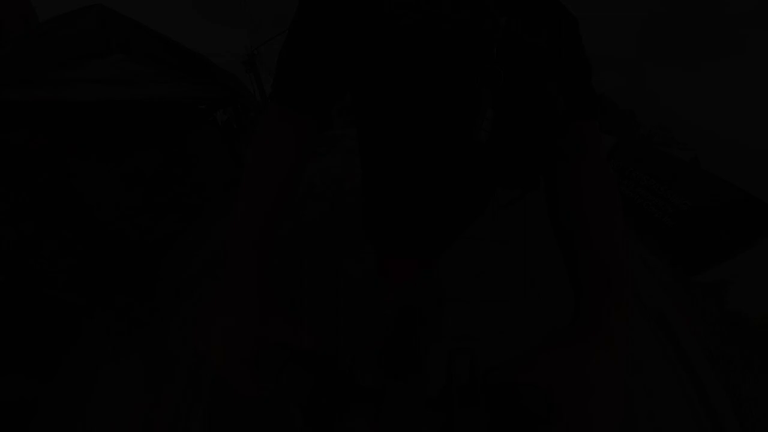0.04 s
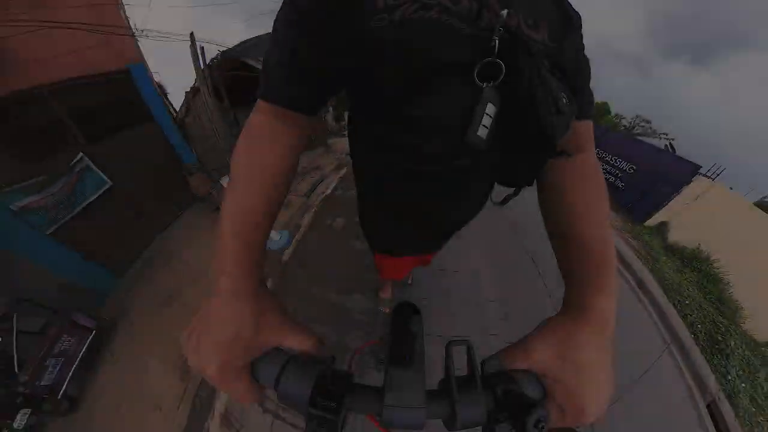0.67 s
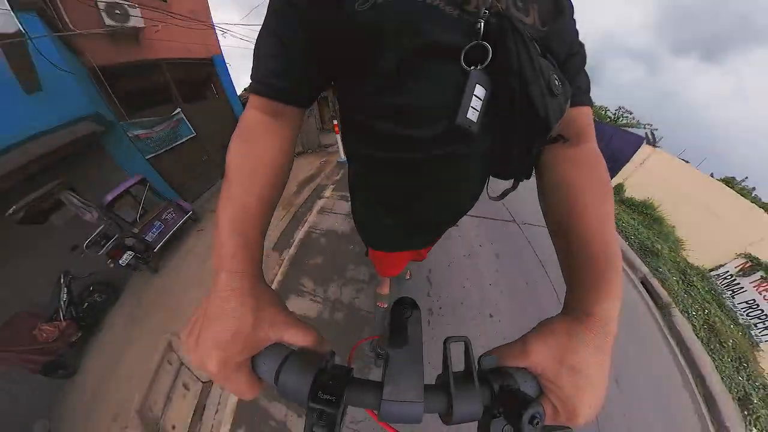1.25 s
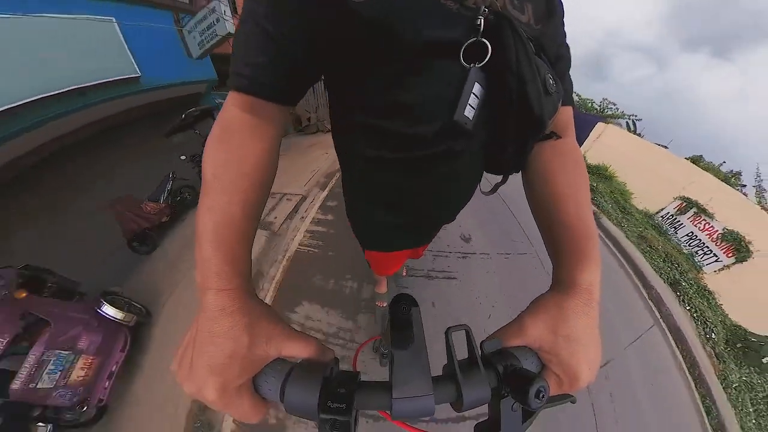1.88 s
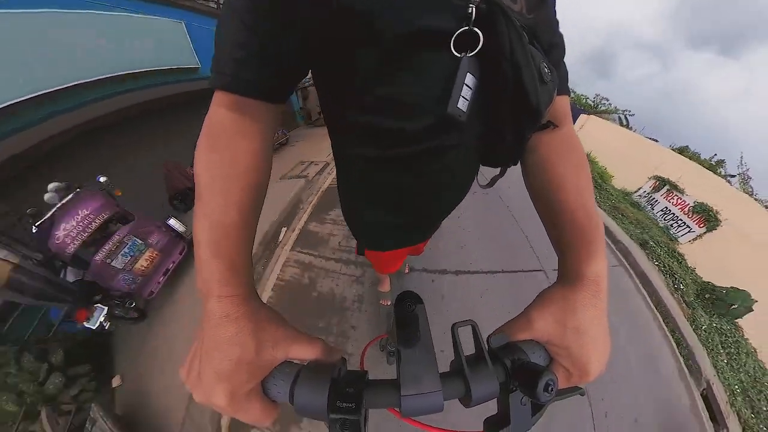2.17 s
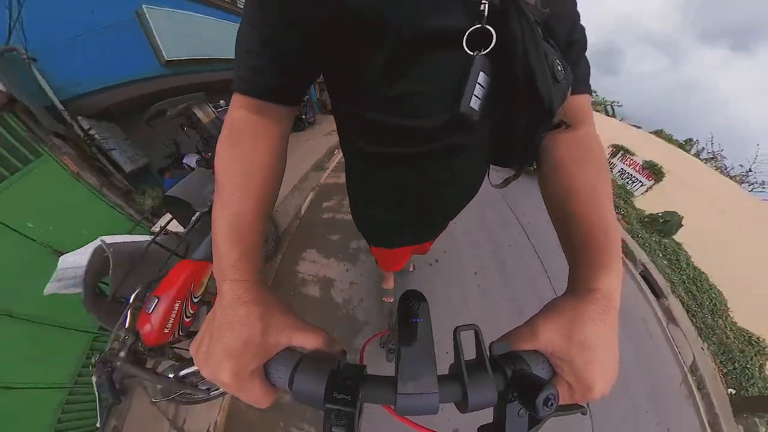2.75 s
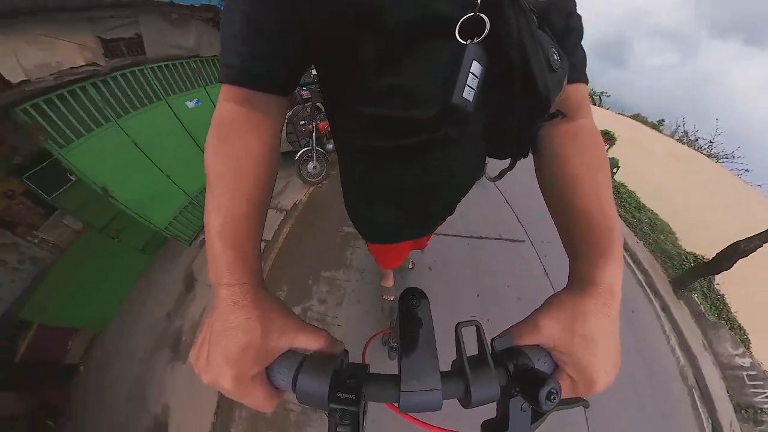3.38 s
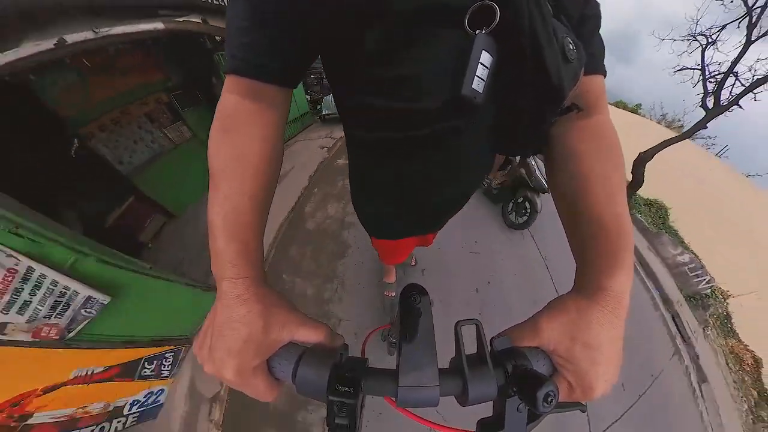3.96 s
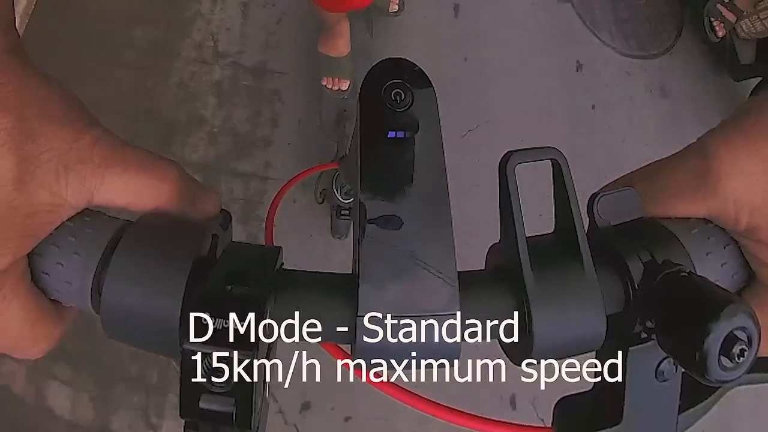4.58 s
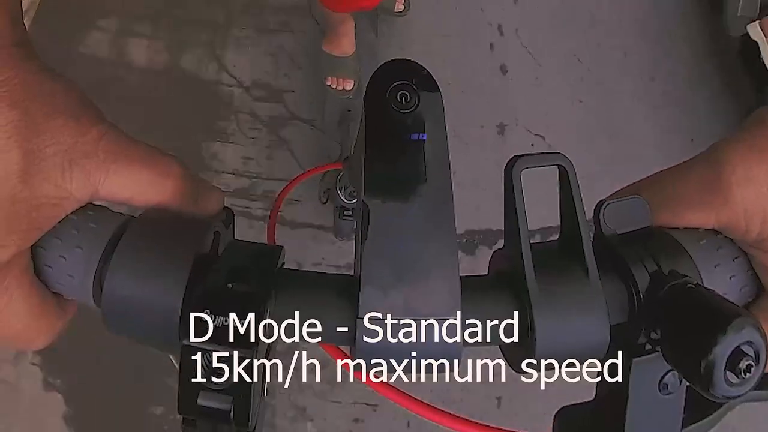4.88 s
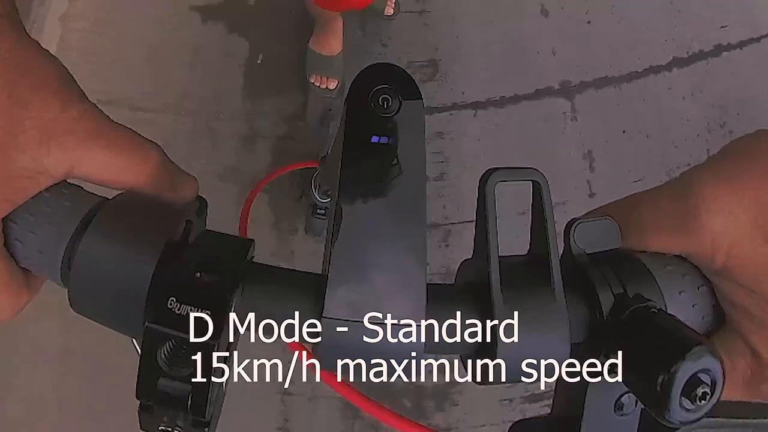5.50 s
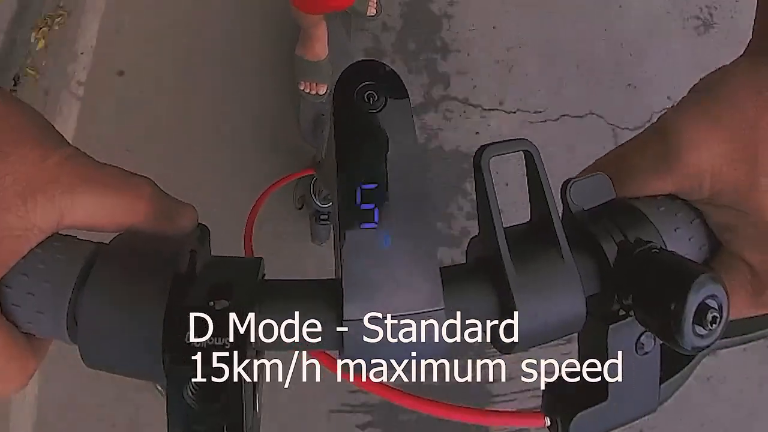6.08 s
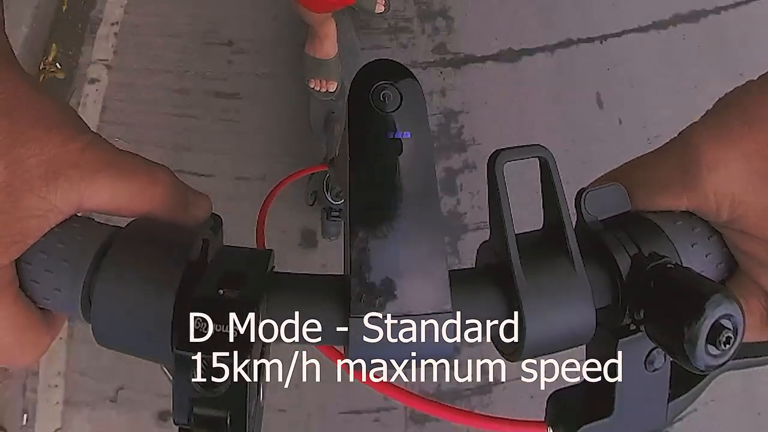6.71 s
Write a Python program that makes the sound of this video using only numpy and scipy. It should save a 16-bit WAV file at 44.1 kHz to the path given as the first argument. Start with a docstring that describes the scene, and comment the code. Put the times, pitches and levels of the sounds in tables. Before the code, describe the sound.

An electric scooter rolls along a concrete street, heard from the handlebar. The sound fades in over the first half second: deep tyre and frame rumble, wind buffeting the microphone, and a soft, steady motor hum with a faint whine. The wheels knock and thud irregularly over joints throughout, most densely from about 0.8 to 1.7 seconds, with hard jolts clacking the stem. From 2 seconds, street noise and a thin hiss swell with a faint hollow ring. A few short, faint squeaks come between 2.5 and 3.1 seconds. The wind gusts harder from about 3.5 seconds, and a cluster of strong jolts lands just after 4. A motorcycle then putters past in the background, strongest around 4.6 and 5.5 seconds. A loose part rattles lightly, mostly from 5.3 to 5.8 seconds. Rumble, gusts and bumps continue until the end, near 6.7 seconds.

```python
"""An electric scooter rolls down a concrete street, heard from its handlebar.
The ride fades in: the road shakes the frame, the hub motor hums, wind buffets the microphone.
From the first second the wheels knock over joints, and hard jolts clack the stem. From 2 s street
noise swells with a hollow ring; near 3 s something squeaks at the roadside. From 4 s a motorcycle
putters past the other way and a loose part rattles."""
import sys
import numpy as np
from scipy.fft import rfft, irfft, next_fast_len
from scipy.io import wavfile
from scipy.ndimage import uniform_filter1d, minimum_filter1d, map_coordinates

SR = 44100
rng = np.random.default_rng(int(sys.argv[2]) if len(sys.argv) > 2 else 0)


def digitize_waveform(pressure):
    """Quantize a signal to 16-bit integers and store it at the path in sys.argv[1].

    Rows of a 2-D input are taken as channels; values are limited to [-1, 1].
    """
    field = np.atleast_2d(pressure).T
    bounded = np.clip(field, -1, 1)
    quanta = np.round(bounded * 32767).astype(np.int16)
    wavfile.write(sys.argv[1], SR, quanta)


N = 297234
TIME_S = np.arange(N) / SR


# frame rumble, road grain: f/Hz, level/dB
FRAME_SPECTRUM = [(40, -39.5), (80, -2.5), (112, 4.5), (150, 0.5), (190, -5.5), (260, -18.5), (600, -56.5),
                  (1500, -100)]
ROAD_SPECTRUM = [(100, -37), (200, -4.5), (260, 1.5), (330, 0.5), (430, -6.5), (520, -8), (620, -17),
                 (850, -21), (1200, -35.5), (2500, -59.5), (4500, -87.5)]
# rougher and smoother concrete: t/s, gain/dB, half width/s
ROAD_PATCHES = [(2.17, 2.5, 0.095), (3.9, -5, 0.11), (4.11, 2, 0.061), (5.85, -2.5, 0.15)]

def rolling():
    """Rough concrete kicks the wheels; the frame rumbles."""
    kicks = unit(impacts(per_s=400, spread_db=3) + 0.5 * noise())
    frame_db = -27 - 0.39 * TIME_S + 0.38 * wobble(14)
    road_db = -34 + 0.73 * TIME_S + 0.85 * wobble(18)
    road_db += sum(db * swell(t, half_s) for t, db, half_s in ROAD_PATCHES)
    return amp(frame_db) * coloured(kicks, FRAME_SPECTRUM) + amp(road_db) * coloured(kicks, ROAD_SPECTRUM)


# wheel knocks, tyre thuds, stem clacks: t/s, level/dB, f/Hz
WHEEL_KNOCKS = [(0.198, -35.5, 480), (0.3427, -21, 436), (0.575, -29.5, 480), (0.8099, -20, 388),
                (0.8365, -14, 400), (0.8493, -19, 410), (0.9215, -22.5, 440), (1.0205, -24, 420),
                (1.0954, -16, 380), (1.1005, -12.5, 430), (1.1989, -18, 310), (1.3244, -16, 350),
                (1.404, -20.5, 320), (1.446, -18, 400), (1.4565, -17, 410), (1.548, -20, 470),
                (1.581, -26, 440), (1.667, -14, 400), (1.675, -20, 380), (1.6941, -21.5, 325),
                (1.952, -22.5, 420), (1.989, -22, 460), (2.1563, -17.5, 330), (2.178, -17, 260),
                (2.631, -16, 400), (2.8051, -21.5, 357), (2.8526, -19, 345), (2.9453, -21, 400),
                (3.3735, -20, 385), (3.724, -23, 520), (3.742, -20, 360), (3.798, -16.5, 335),
                (3.842, -28, 470), (4.0505, -21, 440), (4.106, -13.5, 410), (4.1146, -16.5, 355),
                (4.2402, -21.5, 450), (4.264, -24, 370), (4.419, -31, 490), (4.4571, -19.5, 390),
                (4.547, -21, 490), (5.568, -22, 520), (5.7426, -18, 395), (5.768, -21.5, 470),
                (5.858, -17, 355), (6.191, -23.5, 470), (6.2015, -22, 377), (6.329, -19, 460),
                (6.5921, -17, 430), (6.664, -18.5, 335)]
TYRE_THUDS = [(0.8506, -15.5, 131), (0.952, -12, 116), (1.0998, -17, 129), (1.4372, -13.5, 127),
              (1.551, -15, 130), (1.678, -11.5, 129), (1.9566, -12.5, 148), (2.158, -11.5, 185),
              (2.633, -9.5, 125), (4.1217, -12, 156), (4.153, -11.5, 115), (4.164, -14.5, 125),
              (4.3185, -21, 118), (4.623, -17, 101), (4.6431, -11, 100), (4.7761, -11, 105),
              (5.2114, -14, 126), (5.487, -13, 104), (5.7426, -13.5, 129), (5.922, -16.5, 98),
              (6.663, -12, 135)]
STEM_CLACKS = [(0.3425, -43, 660), (0.348, -32, 670), (0.3539, -32.5, 670), (0.8187, -29, 700),
               (0.8368, -26, 960), (0.8502, -27.5, 720), (1.0943, -26.5, 1100), (1.0963, -34, 1650),
               (1.0995, -25.5, 760), (1.103, -26.5, 726), (1.3245, -29, 736), (1.4455, -28.5, 720),
               (1.457, -30, 660), (1.4624, -27, 690), (1.4675, -29, 720), (1.5485, -32, 700),
               (1.666, -28, 620), (2.63, -32, 780), (3.7405, -29.5, 650), (4.0515, -35.5, 770),
               (4.1069, -29.5, 660), (4.1603, -17.5, 830), (4.7119, -27, 700), (4.853, -28, 800),
               (4.9422, -26, 920), (5.2716, -22.5, 980), (5.3313, -27, 900), (5.4263, -27.5, 820),
               (5.5717, -31, 790), (6.5934, -22.5, 680)]
# stem chatter: f/Hz, level/dB
CHATTER_SPECTRUM = [(150, -29), (300, 0), (550, 6), (850, -10), (1300, -17), (2200, -37), (3500, -66)]

def bumps():
    """Joints knock the wheels; hard jolts shake the stem. Rubber tyres cut the treble."""
    out = np.zeros(N)
    for t, db, hz in WHEEL_KNOCKS:
        add(out, t, amp(db) * (knock(hz, cycles=0.69) + amp(-5) * deck_boom()))
    for t, db, hz in TYRE_THUDS:
        add(out, t, amp(db) * knock(hz, cycles=0.55))
    for t, db, hz in STEM_CLACKS:
        add(out, t, amp(db) * knock(hz, cycles=0.81))
    chatter = amp(-13) * bursts(STEM_CLACKS, t60_s=0.04) * coloured(noise(), CHATTER_SPECTRUM)
    return filtered(out + chatter, lambda hz: 1 / (1 + (hz / 3300) ** 10))


def knock(hz, cycles):
    """Rubber-cushioned swing, gone within a cycle or two."""
    turns = event_time_s() * hz
    return np.exp(-(turns / cycles) ** 2) * np.sin(2 * np.pi * turns)


def deck_boom(attack_s=0.0017, t60_s=0.052):
    """One damped deck mode; pitch varies per knock."""
    age_s = np.maximum(event_time_s(), 0)
    hz = 217 * np.exp(0.055 * rng.standard_normal())
    return np.tanh(age_s / attack_s) * amp(-60 * age_s / t60_s) * np.sin(2 * np.pi * hz * age_s)


# motor hum: t/s, f/Hz, level/dB
MOTOR_HUM = [(0.1, 131, -31.5), (0.5, 131, -28), (0.8, 134, -27), (1.35, 135, -31.5), (1.7, 137, -28.5),
             (2.4, 139.4, -24.5), (3.05, 141.1, -24.5), (3.5, 142, -30), (3.85, 141.5, -30.5),
             (4.2, 140.8, -41), (4.9, 139.1, -30.5), (5.6, 142, -41.5), (6.7, 137.8, -31.5)]

def hub_motor(whine_hz=527.6):
    """Hum and a growing whine, both shaken by the road."""
    hum_hz, hum_db = curves(MOTOR_HUM)
    hum = amp(hum_db + 0.5 * wobble(12)) * tone(hum_hz + 2.4 * wobble(30))
    whine = amp(-45.7 + 0.3 * TIME_S + 3.5 * wobble(24)) * tone(whine_hz + 12 * wobble(60))
    return np.sqrt(2) * (hum + whine)  # levels are rms


# buffeting: f/Hz, level/dB
WIND_SPECTRUM = [(12, -36), (24, -13.5), (38, -3.5), (60, 2), (90, -0.5), (130, -2.5), (300, -35),
                 (900, -78.5)]
# gusts and lulls: t/s, gain/dB
WIND_GUSTS = [(0.8, 1.5), (1.07, 2), (2.1, -2.5), (2.4, -4), (2.72, -2.5), (2.88, -9.5), (3.17, 1),
              (3.58, 6), (3.85, 4), (4.13, 4.5), (4.26, -5), (4.37, -5.5), (4.64, 4.5), (5.08, 1.5),
              (5.48, 3.5), (5.65, 2), (6.38, 6)]

def wind():
    """Eddies break on the microphone, growing along the ride."""
    level_db = -29.5 + 0.45 * TIME_S + sum(db * swell(t, half_s=0.041) for t, db in WIND_GUSTS)
    return amp(level_db) * unit(coloured(noise(), WIND_SPECTRUM) * amp(0.59 * wobble(22)))


# engine firing rate: t/s, f/Hz
FIRING_RATE = [(4.0, 30.5), (4.8, 31.6), (5.4, 31.8), (6.0, 31.0), (6.72, 39)]

def engine_puffs():
    """One decaying pulse per motorcycle firing."""
    firing_hz, = curves(FIRING_RATE)
    firings = np.cumsum(firing_hz + 0.51 * wobble(8)) / SR
    return np.exp(-(firings % 1) / 0.21) - 0.3


# motorcycle pass: t/s, level/dB
EXHAUST_LEVEL = [(3.6, -70.5), (4.2, -50), (4.6, -43), (4.9, -50), (5.2, -46), (5.29, -41.5), (5.5, -40.5),
                 (5.8, -47.5), (6.3, -49.5), (6.72, -50.5)]
# exhaust: f/Hz, level/dB
EXHAUST_SPECTRUM = [(120, -12), (350, 6.5), (700, 3), (950, -13.5), (1200, -3.5), (1600, -5.5),
                    (2300, -12.5), (3400, -24.5), (4500, -44), (9000, -83.5)]

def motorcycle(puffs):
    """Exhaust noise, pulsed by the firings, swells in passing."""
    level_db, = curves(EXHAUST_LEVEL)
    return amp(level_db) * coloured(noise() * (1 + 1.7 * puffs), EXHAUST_SPECTRUM)


# street roar: t/s, level/dB
ROAR_SWELLS = [(0.6, -52.5), (0.78, -49.5), (0.9, -53), (1.45, -50), (1.75, -52), (2.0, -47), (2.4, -44),
               (2.95, -43), (3.27, -45.5), (3.6, -44.5), (3.85, -47), (4.05, -42.5), (4.2, -46.5),
               (4.3, -45), (4.57, -39.5), (4.87, -38.5), (5.17, -42), (5.33, -37), (5.8, -46.5), (6.0, -42),
               (6.38, -41), (6.7, -44.5)]
# street roar: f/Hz, level/dB
ROAR_SPECTRUM = [(200, -16.5), (550, 5.5), (900, 0.5), (1150, -5), (1600, -8), (2200, -13), (2800, -19.5),
                 (3500, -29.5), (4000, -37), (4600, -54), (6000, -79.5)]

def street_roar():
    """Tyres and traffic: smooth noise plus coarse grains."""
    level_db, = curves(ROAR_SWELLS)
    level_db += wobble(35)
    grit = noise() + 0.9 * impacts(per_s=900, spread_db=2.5)
    return amp(level_db) * coloured(grit, ROAR_SPECTRUM)


# loose part: t/s, relative level/dB
RATTLE_HITS = [(4.265, -54.5), (4.57, -52.5), (5.2619, -42.5), (5.306, -54), (5.3205, -41.5), (5.332, -46),
               (5.353, -48), (5.428, -51), (5.452, -49), (5.4994, -50.5), (5.5625, -49.5), (5.571, -50),
               (5.659, -53), (5.762, -54), (5.9893, -48), (6.2417, -52.5)]
# its clatter: f/Hz, level/dB
RATTLE_SPECTRUM = [(500, -22), (1000, 11.5), (1500, 17.5), (2200, 6.5), (3300, 5.5), (4300, -10.5),
                   (5200, -17.5), (6400, -2), (7500, 0), (8400, -6), (9100, -33.5), (10000, -71)]

def loose_part():
    """Bursts of tiny bright contacts, each with a hollow ring."""
    contacts = impacts(per_s=2000, spread_db=2.5) + 0.7 * noise()
    clatter = amp(2.5) * bursts(RATTLE_HITS, t60_s=0.073) * coloured(contacts, RATTLE_SPECTRUM)
    ring = amp(5) * bursts(RATTLE_HITS, t60_s=0.12) * hollow_noise()
    return clatter + ring


def pebbles(count, max_db=-29.5, range_db=10.5, centre_hz=520):
    """Small stones knock the wheels at random."""
    out = np.zeros(N)
    for when, softness, octave in rng.random((count, 3)):
        t = np.interp(when, [0, 1], [0.1, TIME_S[-1]])
        hz = centre_hz * 2 ** (octave - 0.5)
        add(out, t, amp(max_db - range_db * softness) * knock(hz, cycles=0.78))
    return out


# roadside chirps: t/s, f/Hz, level/dB, upward glide/fraction of f
CHIRPS = [(2.567, 2700, -53, 0.08), (2.583, 2220, -45.5, 0.041), (2.614, 2870, -53, 0.07),
          (2.628, 2120, -42.5, 0), (2.856, 1940, -39.5, 0.05), (2.904, 2050, -42, 0.02),
          (2.950, 2000, -45, 0.02), (2.999, 2124, -41, 0.01), (3.141, 2100, -48, 0.0035)]

def squeaks(half_s=0.0074, jitter_hz=100):
    """Short, rough, gliding chirps over a thin scratching."""
    out, age_s = np.zeros(N), event_time_s()
    knots_s = age_s[::100]
    for t, hz, db, rise in CHIRPS:
        waver_hz = jitter_hz * np.interp(age_s, knots_s, rng.standard_normal(len(knots_s)))
        glide_hz = hz * (1 + rise * np.tanh(age_s / half_s))
        add(out, t, amp(db) * np.exp(-(age_s / half_s) ** 2) * tone(glide_hz + waver_hz))
    envelope = amp(-60 + 1.6 * wobble(70)) * swell(2.82, half_s=0.27)
    scratch = unit(filtered(noise(), lambda f: resonance(f, hz=2350, width_hz=1200) ** 2))
    return out + envelope * scratch


# hollow noise: t/s, level/dB, half width/s
HOLLOW_SWELLS = [(2.5, -53, 0.73), (5.4, -50.5, 0.23), (5.7, -53, 1.3)]
# hollow tones: t/s, f/Hz, level/dB, half width/s
HOLLOW_TONES = [(2.25, 900, -47, 0.071), (2.615, 885, -40, 0.02), (2.73, 893, -41.5, 0.048),
                (5.335, 950, -41, 0.025), (5.495, 903, -40, 0.028), (5.575, 975, -39.5, 0.016),
                (5.665, 903, -42, 0.028)]

def hollow_ring(waver_hz=14):
    """A ring comes and goes in the street noise, at times sharpening to a rough tone."""
    envelope = sum(amp(db) * swell(t, half_s) for t, db, half_s in HOLLOW_SWELLS)
    drift_hz = waver_hz * wobble(90)
    tones = sum(amp(db) * swell(t, half_s) * tone(hz + drift_hz) for t, hz, db, half_s in HOLLOW_TONES)
    return tones * (1 + 0.4 * wobble(120)) + envelope * hollow_noise()


# hollow resonances: f/Hz, width/Hz, level/dB
RING_MODES = [(882, 71, 3.5), (1013, 28, -2), (1570, 110, -12), (2170, 240, -13.5)]

def hollow_noise():
    """Noise through four resonances, rms 1."""
    response = lambda f: sum(amp(db) * resonance(f, hz, width_hz) for hz, width_hz, db in RING_MODES)
    return unit(filtered(noise(), response))


# street hiss: t/s, relative level/dB
HISS_SWELLS = [(0.58, -86), (0.78, -80), (0.88, -86.5), (1.45, -81.5), (1.6, -85), (2.0, -77), (2.4, -71),
               (2.95, -67.5), (3.25, -76), (4.15, -74), (4.57, -61), (4.87, -62.5), (5.17, -70.5),
               (5.33, -62), (5.8, -73), (6.0, -68.5), (6.38, -66.5), (6.7, -76)]
# street hiss: f/Hz, level/dB
HISS_SPECTRUM = [(2000, -24), (3400, -6), (4300, -20.5), (5200, -18.5), (5900, -8), (6700, -2), (7500, 1),
                 (8200, -5), (8700, -16), (9100, -32.5), (10000, -68.5)]

def street_hiss(puffs, flutter_hz=93):
    """Hiss flutters with the distant motorcycle's engine, then beats with its firings as it nears."""
    level_db, = curves(HISS_SWELLS)
    nearness = np.interp(TIME_S, [3.6, 4.1], [0, 1])
    flutter = swell(2.4, half_s=0.55) * np.sin(2 * np.pi * flutter_hz * TIME_S)
    beat = 1 + 0.75 * nearness * puffs + 0.27 * flutter
    gritty_hiss = noise() + 0.55 * impacts(per_s=300, spread_db=4.5)  # faint, fine ticks
    level_db += 1.5 + 1.3 * wobble(23) + wobble(110)
    return amp(level_db) * coloured(gritty_hiss * beat, HISS_SPECTRUM)


def amp(db):
    """dB to gain."""
    return 10 ** (np.asarray(db) / 20)


def unit(x):
    """Scale to rms 1."""
    return x / np.sqrt(np.mean(x ** 2) + 1e-20)


def noise():
    """White noise."""
    return rng.standard_normal(N)


def tone(hz):
    """Sine from per-sample frequency."""
    return np.sin(2 * np.pi * np.cumsum(hz) / SR)


def impacts(per_s, spread_db):
    """Random impulses of uneven size, rms 1."""
    return unit((rng.random(N) < per_s / SR) * rng.choice([-1, 1], N) * amp(spread_db * noise()))


def curves(rows):
    """Per-sample values of each column after time."""
    t, *columns = np.transpose(rows)
    return [np.interp(TIME_S, t, column) for column in columns]


def wobble(knots_per_s):
    """Smooth random curve."""
    coarse_s = TIME_S[::32]
    knots = rng.standard_normal(int(N * knots_per_s / SR) + 4)
    return np.interp(TIME_S, coarse_s, map_coordinates(knots, [coarse_s * knots_per_s]))


def swell(t, half_s):
    """Bell curve centred on t."""
    return np.exp(-((TIME_S - t) / half_s) ** 2)


def bursts(hits, t60_s):
    """Envelope: rounded onset and exponential decay per hit."""
    age_s = np.maximum(np.arange(-SR // 4, SR // 4) / SR, 0)
    shape = np.tanh(age_s / 0.0002) ** 2 * amp(-60 * age_s / t60_s)
    out = np.zeros(N)
    for t, db, *_ in hits:
        add(out, t, amp(db) * shape)
    return out


def event_time_s():
    """0.1 s time axis centred on zero."""
    return np.arange(-SR // 20, SR // 20) / SR


def add(out, t, wave):
    """Mix wave into out, centred on t."""
    start = round(t * SR) - len(wave) // 2
    part = out[start:start + len(wave)]
    part += wave[:len(part)]


def resonance(f, hz, width_hz):
    """Gain of one mode at f."""
    return 1 / (1 + (2 * (f - hz) / width_hz) ** 2)


def filtered(x, response):
    """Apply a frequency response by FFT."""
    size = next_fast_len(N + SR // 2)
    return irfft(rfft(x, size) * response(np.fft.rfftfreq(size, 1 / SR)), size)[:N]


def coloured(x, spectrum):
    """Shape x by a spectrum on a log axis, rms 1."""
    f, db = np.transpose(spectrum)
    return unit(filtered(x, lambda hz: amp(np.interp(np.log(hz + 1), np.log(f), db))))


def scene(fade_start_s=0.061, fade_s=0.6):
    """Mono mix; bed and pebbles fade in and dip, the other hits do not."""
    bed = wind() + rolling() + hub_motor()
    puffs = engine_puffs()
    bed += motorcycle(puffs) + street_roar() + street_hiss(puffs) + hollow_ring()
    hits = bumps() + loose_part() + squeaks()
    fade = np.clip((TIME_S - fade_start_s) / fade_s, 0, 1) ** 0.96
    return (fade * dips() * (bed + pebbles(count=12)) + hits)[None]


# level dips: t/s, gain/dB
LEVEL_DIPS = [(0.875, -2.5), (1.492, -2.5), (4.195, -5)]

def dips():
    """The level dips briefly after three hard jolts."""
    return amp(sum(db * swell(t, half_s=0.026) for t, db in LEVEL_DIPS))


def record(dry, ceiling_db=-8.5, top_hz=9400):
    """A limiter rounds off the largest peaks; the band ends steeply."""
    needed = np.minimum(1, amp(ceiling_db) / (np.abs(dry[0]) + 1e-9))
    held = minimum_filter1d(needed, size=400)
    gain = uniform_filter1d(uniform_filter1d(held, size=200), size=200)
    return filtered(dry[0] * gain, lambda hz: hz < top_hz)[None]


dry = scene()
out = record(dry)
digitize_waveform(out)
```